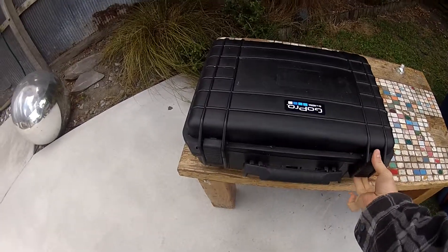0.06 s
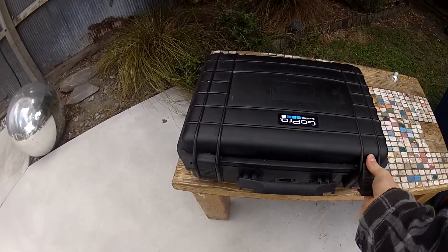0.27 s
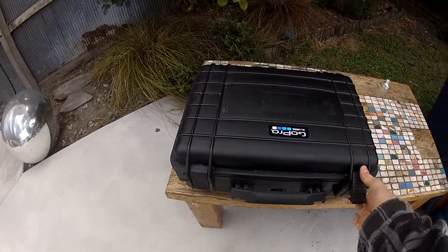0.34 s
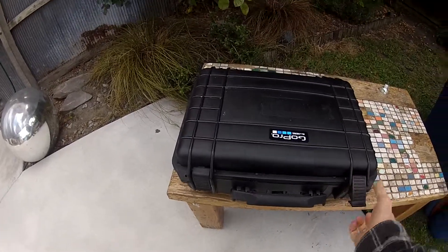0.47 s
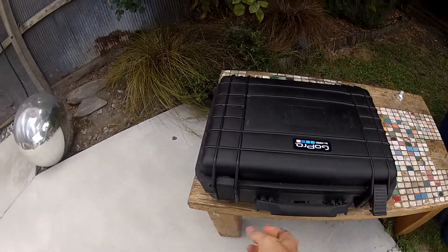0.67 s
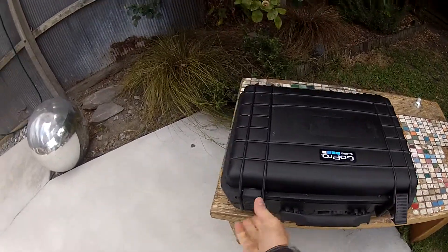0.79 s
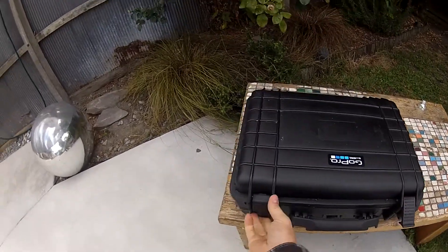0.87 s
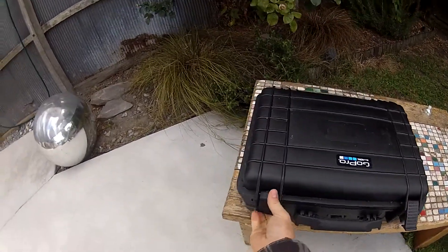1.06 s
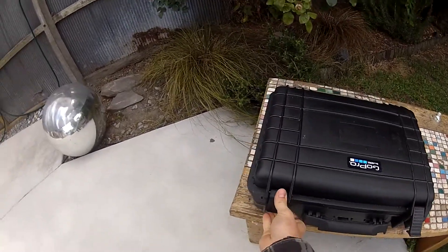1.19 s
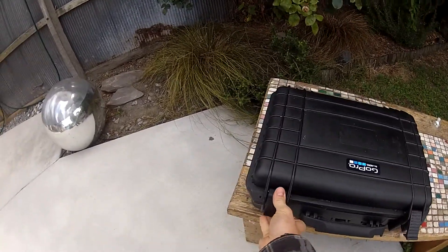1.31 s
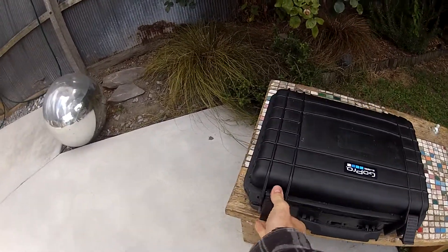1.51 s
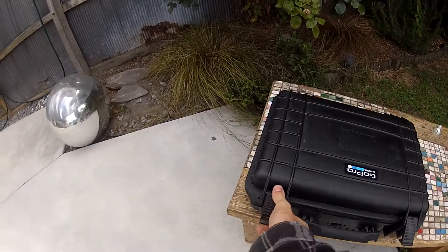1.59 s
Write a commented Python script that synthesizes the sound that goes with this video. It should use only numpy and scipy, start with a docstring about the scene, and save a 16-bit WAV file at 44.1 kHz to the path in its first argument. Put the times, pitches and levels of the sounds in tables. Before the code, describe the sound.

Latches snap open on a hard, hollow plastic case, heard close up outdoors over faint hiss. Two soft nudges come at 0.05 s, then at 0.23 s a loud hollow crack with sharp clicks, a low puff and a quick rattle until 0.31 s. Faint finger rubs and small bumps follow. At 1.37 s a second latch releases more softly, rattling and ringing briefly, with light knocks to about 1.64 s.

```python
"""Faint outdoor hiss lies under the whole scene, swelling slightly; two soft nudges on a hard case open it.
At 0.23 s the first stiff latch is prised open: a hollow thump, sharp clicks, a low puff, then a rattle.
From 0.39 s fingers rub the plastic and nudge the case: swells of tiny slips and soft filtered blows.
At 1.37 s the second latch lets go more softly, thumping and rattling, and a few light knocks follow.
Blows excite shell modes, noise cracks and ringing levers make the clicks, and reflections trail behind."""
import sys
import numpy as np
from scipy import signal
from scipy.fft import rfft, irfft
from scipy.io import wavfile

SR = 44100
rng = np.random.default_rng(int(sys.argv[2]) if len(sys.argv) > 2 else 0)


def file_out(sig):
    """Save sig as 16-bit WAV at sys.argv[1]."""
    # one column per channel
    cols = np.atleast_2d(sig).T
    # limit, then scale
    lim = np.clip(cols, -1, 1)
    pcm = np.round(lim * 32767).astype(np.int16)
    wavfile.write(sys.argv[1], SR, pcm)


N = 72765
T = np.arange(N) / SR

# outdoor hiss, relative colour: pitch_hz [Hz], level_db [dB per Hz]
AIR_COLOUR = [(30, -5), (60, -7.5), (120, -1), (200, -2), (350, -3.5), (520, 2), (700, -3), (950, -10.5),
              (2800, -14.5), (4500, -18.5), (6000, -18.5), (9000, -67)]
AIR_START_DB, AIR_SWELL_DB = -62.5, 2

# the hardest snap pushes a low puff of air past the microphones
PUFF_START_S, PUFF_FADE_S = 0.234, 0.022
PUFF_DB, PUFF_BAND_HZ = -43.5, (30, 110)  # level before the fade and the last low-pass
MIC_HISS_DB = -74.5  # before the recorder narrows the band

# fading sound of case and yard: low_hz [Hz], high_hz [Hz], level_db [dB, before its band filter], t60_s [s]
AFTERSOUND_BANDS = [(54.4, 250, -10, 0.19), (250, 830, -18.5, 0.28), (790, 1500, -12, 0.27),
                    (1500, 3900, -17.5, 0.36), (4500, 7700, -7, .25)]
AFTERSOUND_RISE_S = 0.0051

# plastic rubbing under the fingers: start_s [s], length_s [s], level_db [dB], pitch_hz [Hz]
RUBS = [(0.387, 0.043, -58.5, 2910), (0.893, 0.033, -59, 2830), (0.912, .05, -66.5, 2480),
        (0.981, 0.042, -64.5, 1840), (1.085, 0.022, -61, 3050), (1.109, 0.028, -62.5, 3170),
        (1.135, 0.035, -55, 1750), (1.149, 0.033, -62, 3030)]
SLIPS_PER_S, SLIP_SPREAD_DB = 2500, 3
RUB_BODY_DB, RUB_BODY_HZ = -1.5, (380, 750)  # rubbing also stirs the shell

# colour of a plastic contact: pitch_hz [Hz], level_db [dB]
PLASTIC_COLOUR = [(300, -21.5), (800, -2), (1050, -11), (1600, -5), (2900, -4.5), (3250, -11.5),
                  (3900, -12), (4500, -21), (5400, -16), (6200, -21), (8000, -32.5)]
PITCH_WIDTH_HZ, PITCH_DB = 140, 9

# sharp contacts of the latches:
# start_s [s], level_db [dB], fade_s [s], pitch_hz [Hz], ring_db [dB, lever drive relative to level_db]
CLICKS = [(0.2342, -28.5, 0.0024, 1570, -19), (0.2363, -24.5, 0.0013, 2740, -18),
          (0.2562, -48, 0.0022, 2100, -7), (0.2671, -39, 0.0017, 2900, -21),
          (0.2797, -38, 0.0024, 2120, -20), (0.2822, -34, 0.0015, 2960, -12),
          (0.29, -40.5, 0.0033, 2900, -14), (0.297, -44.5, 0.005, 3020, -16),
          (1.185, -46.5, 0.0017, 1750, -14), (1.3695, -41.5, 0.012, 1770, -9),
          (1.3798, -30.5, 0.0033, 1860, -5), (1.383, -37.5, 0.0042, 2190, 11),
          (1.392, -41.5, 0.0072, 1900, -16), (1.403, -50, 0.02, 2030, -9)]
# modes of a freed latch lever: pitch_hz [Hz], level_db [dB, ring() adds a rise with pitch], t60_s [s]
LEVER_MODES = [(1700, -15.5, .1), (1766, -18, .2), (1915, -18, .1), (2073, -15.5, 0.17), (2310, -12, 0.054),
               (2875, -17, .17), (3000, -19.5, 0.087), (3860, -16.5, 0.052), (3952, -21, .1)]

# blows on the shell: start_s [s], peak_db [dB], low_hz [Hz], high_hz [Hz], ring_db [dB, relative to the blow]
THUMPS = [(0.0541, -37.5, 118, 204, -1), (0.067, -45.5, 140, 289, 4.5), (0.2324, -3.5, 253, 491, 4),
          (0.236, -44.5, 87.6, 125, 14), (0.238, -24, 233, 375, 10.5), (0.2447, -27.5, 193, 348, 12),
          (0.256, -22, 245.5, 594, 5), (0.267, -29, 247, 640, 6), (0.276, -27.5, 250, 603, 6),
          (0.282, -32, 279, 640, -6), (0.290, -31.5, 288, 700, 4), (0.2988, -28, 250, 590, -5),
          (0.308, -35.5, 244, 607, 13.5), (0.412, -42, 130, 583.5, 4), (0.903, -51, 91.1, 500, 8),
          (1.170, -53, 60, 250, 7), (1.1848, -38.5, 430, 650, -12), (1.189, -39, 418, 590, 5),
          (1.329, -50, 475, 743, 0.5), (1.336, -47, 80, 320, -9), (1.347, -52, 80, 297, 0),
          (1.3684, -18.5, 90, 380, 5), (1.375, -25.5, 197, 486, 3), (1.381, -29, 70, 575, 5.5),
          (1.3878, -19, 153, 580, -7), (1.3917, -29, 184, 580, 13), (1.402, -29, 109, 645, -8),
          (1.423, -37, 110.5, 324, -10), (1.512, -49.5, 121, 403, 10.5), (1.582, -45, 132, 206, 9),
          (1.6354, -33.5, 250.3, 558, -7), (1.638, -31.5, 200, 282, 3)]
# modes of the shell and the air in it: pitch_hz [Hz], level_db [dB, ring() adds a rise with pitch], t60_s [s]
SHELL_MODES = [(92.25, -22, .38), (151.2, -37, 0.26), (179.5, -34, .25), (231.4, -21.5, 0.068),
               (296, -17, 0.02), (335, -58.5, .2), (416.5, -41.5, 0.17), (492.4, -41.5, 0.17),
               (556.6, -38, .18), (687, -30.5, .07), (910, -22.5, .035)]

# colour of the mirrored treble: pitch_hz [Hz], level_db [dB]
MIRROR_COLOUR = [(6000, 7), (9000, 3.5), (12000, 1), (15000, 0)]
BAND_EDGE_HZ, HOLD_HZ, CUTOFF_HZ = 5040, 12000, 15500


def from_db(db):
    """Decibels to gain."""
    return 10 ** (np.asarray(db) / 20)


def rms_one(x):
    """Scale to unit power."""
    return x / np.sqrt(np.mean(x ** 2) + 1e-20)


def cut(x, hz, kind, order=2):
    """Butterworth filter."""
    sos = signal.butter(order, hz, kind, fs=SR, output="sos")
    return signal.sosfilt(sos, x + 1e-18)


def delayed(x, start_s):
    """Start a sound at start_s."""
    return np.concatenate([np.zeros(int(start_s * SR)), x, np.zeros(N)])[:N]


def coloured(x, points):
    """Causal, minimum-phase filter that follows a list of (pitch_hz, level_db)."""
    size = 2 * len(x)
    hz, db = np.transpose(points)
    grid_hz = np.maximum(np.arange(size // 2 + 1) * SR / size, 1)
    gain = from_db(np.interp(np.log(grid_hz), np.log(hz), db))
    # folding the cepstrum onto positive time makes the filter causal
    cepstrum = irfft(np.log(gain))
    cepstrum[1:size // 2] *= 2
    cepstrum[size // 2 + 1:] = 0
    return irfft(rfft(x, size) * np.exp(rfft(cepstrum)))[:len(x)]


def resonator_poles(r, w):
    """Denominator of a two-pole resonance with radius r and angle w."""
    return [1, -2 * r * np.cos(w), r * r]


def ring(drive, modes):
    """Decaying modes struck by the drive, stronger with rising pitch and alternating in sign."""
    out = 0
    for k, (pitch_hz, level_db, t60_s) in enumerate(modes):
        r = np.exp(-np.log(1000) / (t60_s * SR))
        w = 2 * np.pi * pitch_hz / SR
        mode = signal.lfilter([0, np.sin(w)], resonator_poles(r, w), drive + 1e-18)
        out = out + (-1) ** k * from_db(level_db) * w * mode
    return out


def plastic(force, pitch_hz):
    """A force on the latch takes a broad plastic colour and one damped resonance; energy is kept."""
    r = np.exp(-np.pi * PITCH_WIDTH_HZ / SR)
    w = 2 * np.pi * pitch_hz / SR
    peak = signal.lfilter(np.array([1, 0, -1]) * (1 - r * r) / 2, resonator_poles(r, w), force)
    tone = coloured(force + from_db(PITCH_DB) * peak, PLASTIC_COLOUR)
    return rms_one(tone) * np.sqrt(np.mean(force ** 2))


def air():
    """Soft outdoor hiss: coloured noise that swells slightly."""
    level_db = AIR_START_DB + AIR_SWELL_DB * T / T[-1]
    return from_db(level_db) * rms_one(coloured(rng.standard_normal(N), AIR_COLOUR))


def microphones():
    """Faint self-noise and one fading low puff of air, opposite in sign at the two ears."""
    rumble = rms_one(cut(rng.standard_normal(N), PUFF_BAND_HZ, "band"))
    puff = rumble * from_db(PUFF_DB) * delayed(np.exp(-T / PUFF_FADE_S), PUFF_START_S)
    puff = cut(puff, PUFF_BAND_HZ[1], "low")  # softens the sudden onset
    hiss = from_db(MIC_HISS_DB) * rng.standard_normal(N)
    return (puff + hiss) * np.array([[1], [-1]])


def aftersound(x):
    """Dense weak reflections, modelled as noise that dies away band by band."""
    response = 0
    for low_hz, high_hz, level_db, t60_s in AFTERSOUND_BANDS:
        rise = 1 - np.exp(-T / AFTERSOUND_RISE_S)
        fade = rise * np.exp(-np.log(1000) * T / t60_s)
        scatter = rng.standard_normal(N) * fade / np.linalg.norm(fade)
        response = response + from_db(level_db) * cut(scatter, [low_hz, high_hz], "band", order=3)
    return signal.fftconvolve(x, response)[:N]


def fingers():
    """Each rub is a swell of tiny random slips, heard in the latch and in the shell."""
    out, t = 0, T[:SR // 8]
    for start_s, length_s, level_db, pitch_hz in RUBS:
        hits = rng.random(len(t)) < SLIPS_PER_S / SR
        strength = from_db(SLIP_SPREAD_DB * rng.standard_normal(len(t)))
        slips = rms_one(hits * strength * rng.choice([-1, 1], len(t)))
        swell = np.sin(np.pi * np.minimum(t / length_s, 1))
        body = from_db(RUB_BODY_DB) * rms_one(cut(slips, RUB_BODY_HZ, "band"))
        rub = plastic(slips * swell, pitch_hz) + body * swell
        out = out + delayed(from_db(level_db) * rub, start_s)
    return out


def latches():
    """A contact is a short rough crack of fading noise; a freed lever rings on in its own modes."""
    direct, drive, t = 0, 0, T[:SR // 5]
    for start_s, level_db, fade_s, pitch_hz, ring_db in CLICKS:
        force = rng.choice([-1, 1], len(t)) * np.exp(-t / fade_s)
        direct = direct + delayed(from_db(level_db) * plastic(force, pitch_hz), start_s)
        drive = drive + delayed([from_db(level_db + ring_db)], start_s)
    return direct + ring(drive, LEVER_MODES)


def shell():
    """Each blow flexes the shell for a cycle or two and leaves its modes ringing."""
    direct, drive = 0, 0
    for start_s, peak_db, low_hz, high_hz, ring_db in THUMPS:
        flex = cut(signal.unit_impulse(SR // 10), low_hz, "high", order=3)
        flex = cut(flex, high_hz, "low", order=8)
        blow = delayed(from_db(peak_db) * flex / np.abs(flex).max(), start_s)
        direct = direct + blow
        drive = drive + from_db(ring_db) * blow
    return direct + ring(drive, SHELL_MODES)


def scene():
    """The case straight ahead, in the open air."""
    case = shell() + latches() + fingers()
    return case + aftersound(case) + air() + microphones()


def record(dry):
    """A narrow-band recorder whose held samples add a glassy mirror image in the treble; the top is cut."""
    narrow = cut(dry, BAND_EDGE_HZ, "low", order=8)
    slope = np.gradient(narrow, axis=-1) * SR / (2 * np.pi * HOLD_HZ)
    carrier = 2 * np.cos(2 * np.pi * HOLD_HZ * T)  # mirrors the sound around HOLD_HZ
    mirror = np.array([coloured(side * carrier, MIRROR_COLOUR) for side in slope])
    top_cut = signal.ellip(10, 0.1, 80, CUTOFF_HZ, fs=SR, output="sos")
    return signal.sosfilt(top_cut, narrow + mirror)


dry = scene()
out = record(dry)
file_out(out)
```